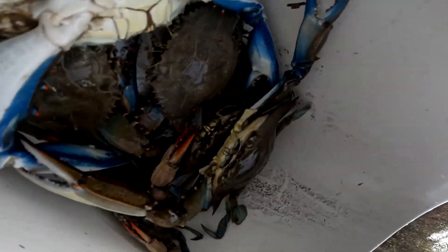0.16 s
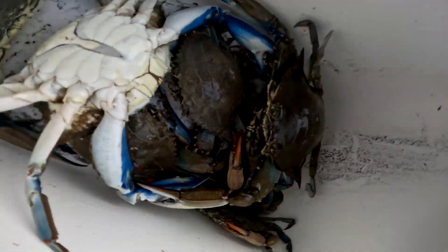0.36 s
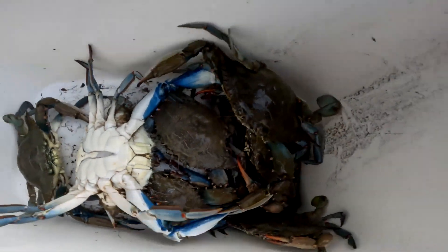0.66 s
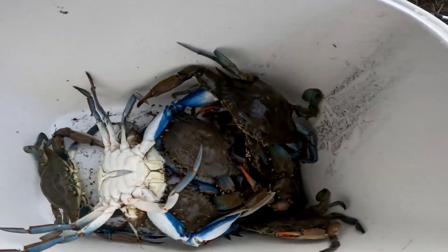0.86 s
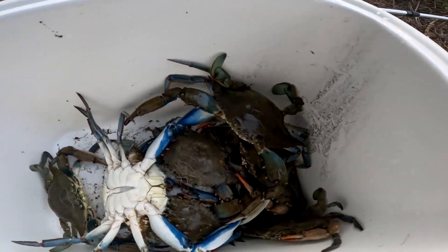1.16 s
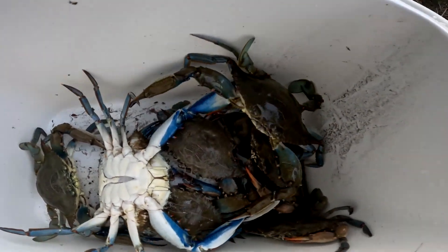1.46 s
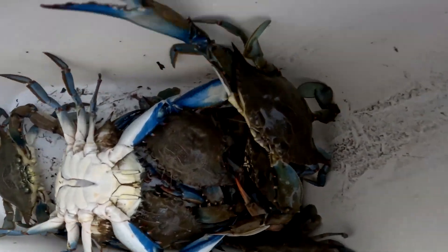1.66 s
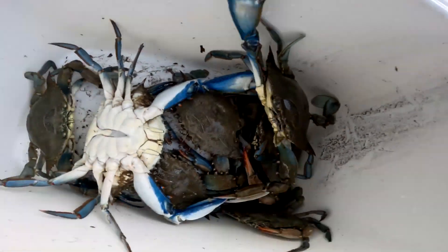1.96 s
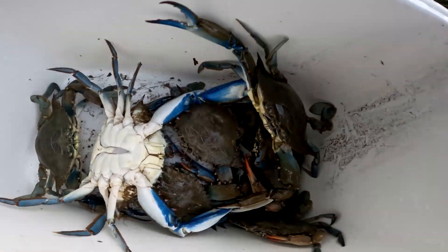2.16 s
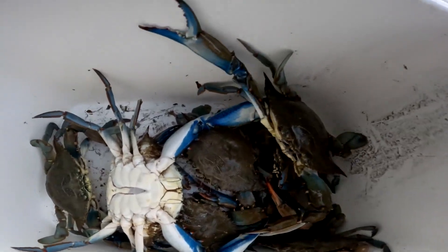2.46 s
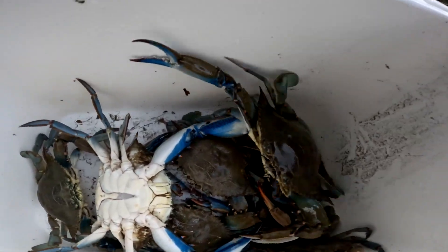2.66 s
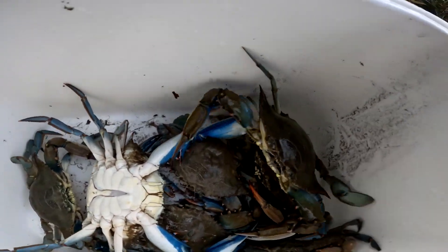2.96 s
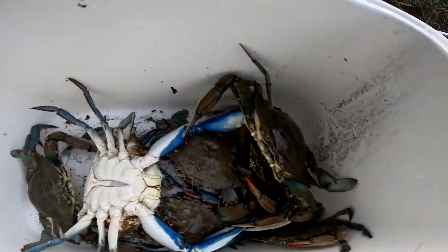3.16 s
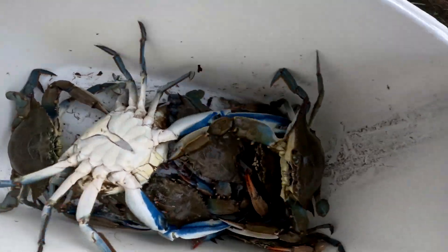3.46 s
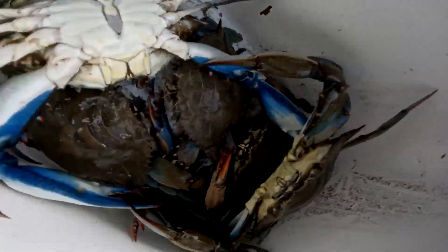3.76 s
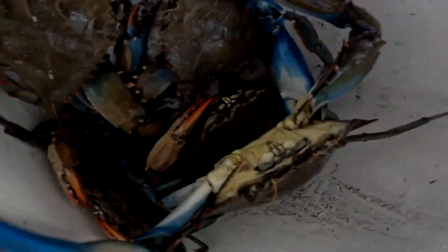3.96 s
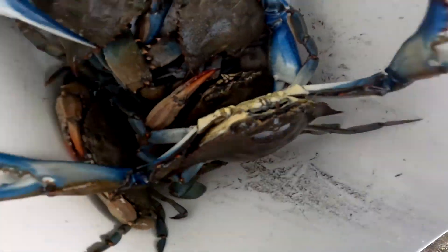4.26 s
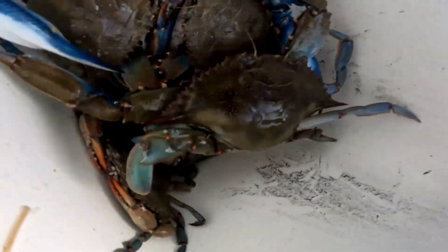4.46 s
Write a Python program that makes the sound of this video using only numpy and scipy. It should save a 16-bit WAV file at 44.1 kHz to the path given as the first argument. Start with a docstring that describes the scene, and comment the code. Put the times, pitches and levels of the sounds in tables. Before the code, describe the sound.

Live crabs knock, tick and scrape inside a hollow plastic bucket outdoors, over a low rumble and a swelling engine drone.

```python
"""Crabs in a plastic bucket

Outdoors, a phone is held over the mouth of a bucket of live crabs, its two microphone ports close to the action.
Shells thud the floor; claw and leg tips tick, scrape and crackle over the plastic: all are forces that
ring damped bucket modes. A halo of faint throbbing sine tones swells just before the hardest knock.
Behind, wavering sine tones make an engine that draws nearer on a falling note, over a rumble of shaped noise.
"""
import sys
import numpy as np
from scipy import signal
from scipy.fft import rfft, irfft
from scipy.io import wavfile
from scipy.ndimage import uniform_filter1d

SR = 44100
rng = np.random.default_rng(int(sys.argv[2]) if len(sys.argv) > 2 else 0)


def persist_wave(psi):
    """Save psi, clipped to +-1, as 16-bit WAV."""
    counts = np.round(np.clip(psi, -1, 1) * 32767).astype(np.int16)
    wavfile.write(sys.argv[1], SR, np.atleast_2d(counts).T)


def volts_from_decibels(level):
    """Turn decibel levels (scalar or array-like) into linear amplitude factors."""
    exponent = np.asarray(level, float) / 20
    return 10 ** exponent


N = 203705
T = np.arange(N) / SR  # s


def unit(x):
    """Scale to rms 1."""
    return x / np.sqrt(np.mean(x ** 2))


def curves(table):
    """Turn the columns after start_s into sample-rate curves."""
    s, *columns = np.transpose(table)
    return [np.interp(T, s, column) for column in columns]


def walk(rate):
    """Random levels held 1 / rate s and slewed twice; spread near 1."""
    hold = max(int(SR / rate), 2)
    steps = np.repeat(rng.standard_normal(N // hold + 1), hold)
    slewed = uniform_filter1d(uniform_filter1d(steps, hold), hold)
    return 1.297 * slewed[:N]


def ring(forces, modes):
    """Damped modes, each struck by its own row of force; white force of rms 1 comes out at rms 1."""
    out, power = 0, 0
    for k, (hz, t60, db) in enumerate(modes):
        radius = np.exp(-np.log(1000) / (t60 * SR))
        angle = 2 * np.pi * hz / SR
        gain = (-1) ** k * volts_from_decibels(db) * np.sqrt(1 - radius * radius) * .5
        poles = [1, -2 * radius * np.cos(angle), radius * radius]
        out = out + gain * signal.lfilter([1, 0, -1], poles, forces[k][:N])
        power += volts_from_decibels(db) ** 2 * .5
    return out / np.sqrt(power)


def favour(modes, hz, db_per_octave):
    """Where a blow lands decides which mode it favours: gains falling away from hz."""
    octaves = np.abs(np.log2(np.array(modes)[:, :1] / hz))
    return volts_from_decibels(-db_per_octave * octaves)


def wander(force, modes, db):
    """A moving contact feeds each mode now more, now less."""
    return np.array([force * volts_from_decibels(db * walk(24.88)) for _ in modes])


# Low bucket modes, the drumming floor: pitch_hz [Hz], t60_s [s], level_db [dB, relative]
FLOOR_MODES = [(125, 0.085, 5), (161.3, 0.027, 5), (211.5, 0.038, 4), (302, 0.039, 4), (338.3, 0.061, 5.5),
               (399, 0.016, -3)]
# Shell against bucket: start_s [s], level_db [dB, relative], contact_ms [ms, push and rebound],
# pitch_hz [Hz, favoured floor note]
SHELL_THUDS = [(0.134, -4.5, 1.65, 357), (0.245, -22.5, 2.6, 365), (0.512, -14.5, 2.3, 292),
               (0.544, -7, 2.44, 147), (0.659, -7, 1.32, 303), (0.719, -10.5, 1.22, 302),
               (0.901, -13, 3.9, 152), (1.012, -16, 1.54, 356), (1.112, -8.5, 1.2, 166),
               (1.221, -14.5, 3.5, 340), (1.642, -8.5, 2.04, 155), (1.707, -16, 5.7, 156),
               (1.745, -18, 4.1, 161), (1.802, -21, 3, 297), (1.844, -15.5, 2.2, 302),
               (1.899, -11.5, 4.4, 209), (1.908, -9, 2.86, 340), (2.112, 1.5, 2.37, 162),
               (2.154, -13, 3.5, 342), (2.229, -20.5, 2.8, 160), (2.331, -10, 2.84, 158),
               (2.464, -10, 1.17, 176), (2.561, -5, 2.03, 161), (2.698, -13, 1.4, 370),
               (2.742, -4, 1.85, 153.2), (2.95, -9.5, 0.88, 300), (3.075, -14, 1, 300),
               (3.129, -13, 0.98, 328), (3.696, -14.5, 1.3, 306), (3.786, -19.5, 4.2, 144.9),
               (3.841, -3.5, 1.9, 133), (3.99, -13.5, 2.54, 296), (4.097, -5, 3.1, 190),
               (4.112, -8.5, 1.15, 300), (4.136, -14, 3, 217), (4.175, -11, 1.6, 223),
               (4.192, -13, 2.8, 215), (4.205, -4, 2, 224), (4.219, -11.5, 2, 206), (4.334, -4, 2.7, 276),
               (4.406, -3, 1.04, 141), (4.487, -15, 1.62, 315), (4.529, -11, 1.64, 304),
               (4.591, -12.5, 1.9, 298)]


def thuds():
    """A soft push with a rebound, one sine cycle, sets the floor drumming."""
    force = np.zeros((len(FLOOR_MODES), N + SR))
    for s, db, ms, hz in SHELL_THUDS:
        push = np.sin(np.linspace(0, 2 * np.pi, max(int(ms * SR / 1000), 8)))
        push = push / np.sqrt(np.sum(push ** 2))
        start = int(s * SR)
        lean = favour(FLOOR_MODES, hz, db_per_octave=8.5)
        force[:, start:start + len(push)] += volts_from_decibels(db) * push * lean
    return volts_from_decibels(12.5) * ring(force, FLOOR_MODES)


# Bucket modes from low to high: pitch_hz [Hz], t60_s [s], level_db [dB, relative]
WALL_MODES = [(505, 0.044, -1), (645.4, 0.026, 0.5), (866, 0.017, 0), (1049, 0.018, 3.5), (1270, 0.0063, 2),
              (1454, 0.014, 2.5)]
SHELL_MODES = [(1753, 0.0055, 0.5), (2400, 0.005, -2.5), (2690, 0.0068, -4), (3460, 0.0031, -2.5),
               (4160, 0.0025, -4.5), (5380, 0.0016, -6.5), (6200, 0.0013, -12.5)]
EDGE_MODES = [(7800, 0.00038, 6), (11060, 0.001, 2.5), (11840, 0.0014, 4.5), (15000, 0.0013, -24)]
# Claw and leg tips: start_s [s], level_db [dB, relative], sharpness_db [dB, top against knock],
# chatter_ms [ms, time scale of the burst, which stops growing at 30], pitch_hz [Hz, favoured wall note]
TIP_TICKS = [(0.105, -31.5, -5, 24, 540), (0.134, -11, -33.5, 16.3, 553), (0.227, -32, -31, 13, 546),
             (0.244, -15.5, -30, 14.3, 580), (0.286, -22, -32, 34, 570), (0.391, -28, -28, 14, 1800),
             (0.442, -15.5, -15, 12.5, 935), (0.545, -21, -7, 18, 625), (0.568, -27, -3.5, 31, 1070),
             (0.596, -24, -5.5, 6.2, 1450), (0.627, -18, -16, 11, 1180), (0.684, -21.5, -24, 8, 630),
             (0.704, -31, -33, 32, 980), (0.8, -21, -46, 18, 1100), (0.905, -24, -28.5, 14, 970),
             (0.994, -20.5, -29, 30, 665), (1.016, -16.5, -55, 38, 620), (1.037, -20.5, -40, 18, 644),
             (1.057, -40.5, 10, 15, 1340), (1.076, -30, 6.5, 12, 786), (1.086, -26, 3, 7.5, 1050),
             (1.157, -31, 2, 10, 1410), (1.178, -38, 2, 18, 595), (1.211, -24.5, 4, 4.3, 1060),
             (1.217, -29, 3, 6.5, 1080), (1.2235, -5, -51, 2, 1100), (1.271, -28.5, -4, 22, 910),
             (1.322, -24, -56, 25, 880), (1.376, -30, -42, 9.9, 900), (1.404, -29.5, -44, 11, 1120),
             (1.451, -28, -44, 16, 638), (1.489, -24.5, -44, 24, 1260), (1.64, -22, -29, 16, 590),
             (1.804, -23.5, -44, 9.1, 640), (1.85, -30, -16, 32, 1370), (1.881, -20.5, -2.5, 11, 910),
             (1.91, -15, -47, 23, 680), (1.935, -17.5, -41, 11.7, 1270), (1.956, -34, -9, 13, 2800),
             (2.1125, -6, -26, 10.7, 890), (2.151, -14, -30.5, 9.5, 660), (2.293, -26, -45, 7.7, 710),
             (2.332, -15, -50, 7.8, 490), (2.551, -16.5, -46, 19, 635), (2.601, -25, -15.5, 21, 960),
             (2.711, -26, -52, 11, 630), (2.839, -33, -1, 6.9, 1020), (2.866, -24.5, -28, 15.5, 1330),
             (2.912, -20.5, -31, 14, 715), (3.047, -31.5, 1, 14, 1290), (3.072, -9.5, -25, 6.3, 960),
             (3.108, -33.5, -0.5, 12, 665), (3.136, -23, -12, 9.7, 2800), (3.194, -31, -7, 15, 950),
             (3.238, -26, -33, 8.8, 1480), (3.308, -29, -9, 5.5, 673), (3.41, -24.5, -13.5, 43, 646),
             (3.444, -18.5, -7, 21.6, 986), (3.453, -17.5, -32, 40, 1480), (3.561, -40.5, -4, 7.4, 1000),
             (3.616, -28.5, -2.5, 22, 590), (3.666, -23, -54, 7.1, 1100), (3.678, -27.5, -7, 8.2, 1750),
             (3.692, -29.5, -4.5, 13, 4200), (3.735, -31, -4, 17, 734), (3.768, -26.5, -7.5, 8.7, 1030),
             (3.848, -24, -11, 16, 640), (3.866, -24.5, -3.5, 23, 1420), (3.879, -24.5, -3.5, 24, 1480),
             (3.934, -21.5, -3.5, 24, 1450), (3.955, -21.5, -11, 38, 1050), (3.989, -19.5, -8, 65, 1000),
             (4.033, -10, -33, 16, 1080), (4.096, -31, -2, 10, 990), (4.109, -16, -19.5, 7.1, 640),
             (4.137, -15.5, -6.5, 6.2, 1900), (4.152, -15, -8.5, 5.3, 2000), (4.162, -20, -6.5, 5, 1700),
             (4.177, -18, -16, 8.5, 940), (4.196, -11, -15, 2.5, 1510), (4.209, -10.5, -14, 2.5, 1520),
             (4.217, -21, -14, 2.8, 1900), (4.221, -19, -14, 2, 2020), (4.226, -23, -17, 2.6, 1900),
             (4.231, -25, -14, 3.3, 1900), (4.327, -11.5, -15, 6.4, 1010), (4.337, -11, -17, 13.3, 633),
             (4.411, -22.5, -34, 32, 1065), (4.487, -18, -22, 4.3, 1410), (4.516, -19, -14, 28, 1100),
             (4.527, -18.5, -5, 19, 1110), (4.552, -8.5, -36, 19, 1220), (4.591, -15, -31, 42, 1010)]


def ticks():
    """Each tip knocks the wall, then chatters: spiky noise bursts into wall, shell and edge modes."""
    wall, shell, edge = (np.zeros((len(m), N + SR)) for m in (WALL_MODES, SHELL_MODES, EDGE_MODES))
    chance = rng.standard_normal((len(TIP_TICKS), 3, 2048))
    lead_ms = 8
    ms_axis = np.arange(2048) * 1000 / SR - lead_ms
    knock = unit(np.exp(-((ms_axis - .8) / 0.086) ** 2)) / np.sqrt(2048)  # the hard first contact
    for (s, db, sharp_db, ms, hz), (a, b, c) in zip(TIP_TICKS, chance):
        x = ms_axis / np.clip(ms, .4, 30)
        grit = np.exp(0.35 * b + .5 * np.repeat(c[:64], 32))  # slips come in clumps under a ms long
        # faint noise swells for a few ms before each burst
        lead_in = 0.04 * np.exp(np.minimum(ms_axis, 0) / min(2.5, ms / 6))
        burst = a * grit * (np.maximum(x, 0) + lead_in) * np.exp(-3.5 * np.maximum(x, 0))
        burst = burst * np.sqrt(np.sqrt(ms) / np.sum(burst ** 2))
        start = int((s - lead_ms / 1000) * SR)
        at = slice(start, start + 2048)

        wall_lean = favour(WALL_MODES, hz, db_per_octave=12.5)
        wall[:, at] += volts_from_decibels(db) * (0.55 * knock + 0.79 * burst) * wall_lean

        # each tick gets a random balance of shell modes; a high note rings them more
        balance = volts_from_decibels(2.62 * b[:len(SHELL_MODES), None])
        balance = balance * (1 + 1.17 * favour(SHELL_MODES, hz, db_per_octave=21.5))
        shell_force = volts_from_decibels(6.43 + 0.51 * sharp_db) * burst + volts_from_decibels(-12.5) * knock
        shell[:, at] += balance * volts_from_decibels(db) * shell_force

        # sharpness tells most on the edge modes
        edge_balance_db = 1.7 * c[-len(EDGE_MODES):, None]
        edge[:, at] += volts_from_decibels(db - 2.5 + 1.92 * sharp_db + edge_balance_db) * (burst + 2.3 * knock)
    out = volts_from_decibels(17.5) * ring(wall, WALL_MODES) + volts_from_decibels(8.5) * ring(shell, SHELL_MODES)
    return out + volts_from_decibels(14.0) * ring(edge, EDGE_MODES)


# Legs dragging: start_s [s], length_s [s], level_db [dB, relative], sharpness_db [dB],
# pitch_hz [Hz, favoured shell note]
LEG_DRAGS = [(0, 0.02, -38.5, -18, 3000), (0.214, 0.078, -49.5, -10, 1500), (0.338, 0.16, -46, -23, 1720),
             (0.522, 0.093, -32, -9.5, 6430), (0.648, 0.073, -44.5, -16, 3000),
             (0.791, 0.063, -54.5, -30, 1500), (0.981, 0.028, -43.5, -14, 6430),
             (1.025, 0.059, -31.5, -4, 6430), (1.1, 0.029, -46.5, -22, 2120),
             (1.136, 0.098, -45.5, -14, 6430), (1.242, 0.083, -44, -20, 2610),
             (1.432, 0.082, -46, -27, 2440), (1.739, 0.13, -50.5, -26, 2270),
             (1.838, 0.028, -44.5, -17, 2800), (1.87, 0.028, -39, -9, 5000), (1.987, 0.047, -57, -7, 3450),
             (2.231, 0.074, -57.5, -40, 2270), (2.694, 0.057, -42, -32.5, 2270),
             (2.786, 0.061, -46.5, -7.5, 6430), (3.038, 0.1, -38.5, -11, 6430),
             (3.171, 0.052, -49.5, -11, 2800), (3.364, 0.097, -49, -5.5, 1720),
             (3.521, 0.05, -48.5, -44.5, 1720), (3.588, 0.053, -41.5, -10.5, 1850),
             (3.664, 0.07, -44, -21, 4550), (3.736, 0.13, -41, -12.5, 5600),
             (3.839, 0.082, -39.5, -10, 4550), (3.912, 0.1, -33, -6.5, 5600), (4.02, 0.088, -41, -13, 4240),
             (4.096, 0.023, -38, -14.5, 4500), (4.132, 0.045, -31, -11, 4000),
             (4.169, 0.053, -38, -15, 3900), (4.311, 0.032, -34.5, -14, 3400),
             (4.496, 0.43, -38.5, -11, 1500)]


def drags(db_at_zero, slope, modes, db_per_octave):
    """Each drag sets in, holds and dies away; sharpness sets its level in these modes, its note the balance."""
    grip_s, swell_s, release_s = .012, .009, 0.017  # delay to full strength, then two time constants
    out = 0
    for s, length, db, sharp_db, hz in LEG_DRAGS:
        swell = np.exp(-np.maximum(s + grip_s - T, 0) / swell_s)
        release = np.exp(-np.maximum(T - s - length, 0) / release_s)
        lean = favour(modes, hz, db_per_octave)
        lean = lean / np.sqrt(np.mean(lean ** 2))
        out = out + volts_from_decibels(db + db_at_zero + slope * sharp_db) * swell * release * lean
    return out


def scrape():
    """Stick-slip: dense uneven micro-slips, coming in spurts, drive wall, shell and edge modes."""
    spurt_db = 1.5 * walk(30) + 2.5 * walk(90) + 3 * walk(250)
    slips = []
    for _ in range(3):
        slip_db = spurt_db + 0.73 * rng.exponential(size=N)
        slips.append(unit(rng.standard_normal(N) * volts_from_decibels(slip_db)))
    # the constants added to shell and edge keep a faint scrape going when nothing drags
    shell = drags(-0.11, 0, SHELL_MODES, db_per_octave=6) + volts_from_decibels(-64.5)
    edge = drags(0, 1.17, EDGE_MODES, db_per_octave=0) + volts_from_decibels(-76.5)
    wall = drags(-2.3, -0.4, WALL_MODES, db_per_octave=0)
    out = ring(shell * wander(slips[0], SHELL_MODES, db=2.5), SHELL_MODES)
    edge_force = edge * wander(slips[0] + 0.65 * slips[1], EDGE_MODES, db=3.5)
    wall_force = wall * wander(slips[0] + 1.5 * slips[2], WALL_MODES, db=2.5)
    return out + volts_from_decibels(-6.0) * ring(edge_force, EDGE_MODES) + volts_from_decibels(-7.0) * ring(wall_force, WALL_MODES)


def crackle():
    """Spines and leg joints snap in lone fine clicks at random times, louder while legs drag."""
    rate, snap_ms = 220, 3  # mean clicks per s; time constant of the noise after each click
    count = int(rate * 6)
    gap, size, sign = rng.random((count, 3)).T
    at = (np.cumsum(-np.log(1 - gap)) * SR / rate).astype(int)
    heights = volts_from_decibels(np.minimum(-2.5 * np.log(1 - size), 12)) * np.sign(sign - .5)
    clicks = np.zeros(N)
    clicks[at[at < N]] = heights[at < N]
    snap = signal.lfilter([1], [1, -np.exp(-1000 / (snap_ms * SR))], np.abs(clicks))
    clicks = unit(clicks + 0.21 * snap * rng.standard_normal(N)) * volts_from_decibels(-1.5)
    # the added constants keep faint clicks going when nothing drags
    shell = drags(-6.5, 0, SHELL_MODES, db_per_octave=6) + volts_from_decibels(-57.5)
    edge = drags(0, 1.17, EDGE_MODES, db_per_octave=0) * volts_from_decibels(-6) + volts_from_decibels(-76.5)
    wall = drags(-2.3, -0.4, WALL_MODES, db_per_octave=0) + volts_from_decibels(-41.5)
    out = ring(shell * wander(clicks, SHELL_MODES, db=1.5), SHELL_MODES)
    out = out + ring(edge * wander(clicks, EDGE_MODES, db=4.5), EDGE_MODES)
    return out + volts_from_decibels(-5.0) * ring(wall * wander(clicks, WALL_MODES, db=0.5), WALL_MODES)


# Faint tones around the hardest knock: pitch_hz [Hz], level_db [dB, before the throb]
HALO_PARTIALS = [(2150, -29), (2780, -29), (4230, -43), (5700, -38), (7600, -45), (9250, -43.5)]


def tone_halo():
    """Faint throbbing sine tones swell just before the hardest knock and fade inside it."""
    peak_s, swell_s, fade_s, throb_hz = 2.112, 0.0093, .005, 130
    shape = np.exp(-np.maximum(peak_s - T, 0) / swell_s - np.maximum(T - peak_s, 0) / fade_s)
    tones = 0
    for (hz, db), (a, b) in zip(HALO_PARTIALS, rng.random((len(HALO_PARTIALS), 2))):
        throb = np.cos(np.pi * (throb_hz * T + a)) * volts_from_decibels(3 * walk(400))  # two level peaks a cosine cycle
        tones = tones + volts_from_decibels(db) * throb * np.sin(2 * np.pi * (hz * T + b))
    return shape * tones


# The crabs' weight shifting on the bucket floor: start_s [s], level_db [dB rms]
WEIGHT_SHIFT = [(0, -35), (.6, -33), (1.3, -37), (2.4, -44.5), (2.7, -34.5), (3.6, -30.5), (4.15, -23.5),
                (4.28, -26.5), (4.62, -27)]


def shifting():
    """Bodies sliding over one another keep the floor murmuring: uneven noise through its modes."""
    force = rng.standard_normal(N) * volts_from_decibels(2.5 * walk(40))
    murmur = unit(ring(wander(force, FLOOR_MODES, db=0.5), FLOOR_MODES))
    return volts_from_decibels(curves(WEIGHT_SHIFT)[0]) * murmur


def note(hz, wobble, waver_db):
    """A low sine of rms near 1 that wavers in pitch and level."""
    level = np.sqrt(2) * volts_from_decibels(waver_db * walk(16))
    cycles = np.cumsum(hz * (1 + wobble * walk(16))) / SR
    return level * np.sin(2 * np.pi * cycles)


# Engine drawing nearer: start_s [s], pitch_hz [Hz, mean firing note], level_db [dB, mean rms of that note]
ENGINE_APPROACH = [(0, 106, -51), (1, 101.6, -33), (2.2, 94.58, -30), (3.5, 84.88, -24),
                   (4.62, 76.2, -23.5)]


def engine():
    """Two notes slide down together and swell; a loose low note lies under them."""
    hz, db = curves(ENGINE_APPROACH)
    out = volts_from_decibels(db) * note(hz, wobble=0.01518, waver_db=2.5)
    out = out + volts_from_decibels(db - 5) * note(hz * 1.275, wobble=0.02077, waver_db=3.0)
    low_db = db.mean() + 0.64 * (db - db.mean()) - 1  # follows only part of the swell
    return out + volts_from_decibels(low_db) * note(54.84, wobble=0.1137, waver_db=1)


# Spectrum of the outdoor rumble: pitch_hz [Hz], level_db [dB per Hz, relative]
RUMBLE_SPECTRUM = [(20, 1.5), (32, 1.5), (45, -5), (70, 2.5), (140, -11), (400, -28.5), (1000, -34.5),
                   (4000, -54), (16000, -107)]


def air():
    """Outdoor rumble: noise shaped in frequency, its level drifting slowly."""
    hz, db = np.transpose(RUMBLE_SPECTRUM)
    shape = np.interp(np.log(np.fft.rfftfreq(N, 1 / SR) + 1), np.log(hz), db)
    rumble = unit(irfft(rfft(rng.standard_normal(N)) * volts_from_decibels(shape), N))
    return volts_from_decibels(-26.5 + 0.5 * walk(2.7)) * rumble


def scene():
    """Everything reaches both microphone ports alike."""
    crabs = thuds() + ticks() + scrape() + crackle() + shifting()
    mono = crabs + tone_halo() + engine() + air()
    return np.array([mono, mono])


def top_cut(x):
    """Nothing passes above the cut-off."""
    return signal.sosfilt(signal.butter(12, 15700, fs=SR, output="sos"), x)


def record(dry):
    """Treble reaches the two ports by shifting paths, the left a little louder; peaks are rounded."""
    top = signal.sosfiltfilt(signal.butter(3, 11300, "high", fs=SR, output="sos"), dry[0])
    side = top * (volts_from_decibels(1.5) * walk(500) + 0.22)
    side = side + volts_from_decibels(-24.5) * np.gradient(dry[0]) * walk(300)  # the slope of the wave leans to treble
    ports = dry + np.array([side, -side]) + volts_from_decibels(-21) * top * np.array([[1], [-1]])
    ports = signal.sosfilt(signal.butter(4, 33, "high", fs=SR, output="sos"), ports)
    ports = .9 * np.tanh(ports / .9)
    ports = signal.sosfilt(signal.ellip(12, .3, 60, 15700, fs=SR, output="sos"), ports)
    return top_cut(ports)


dry = scene()
out = record(dry)
persist_wave(out)
```